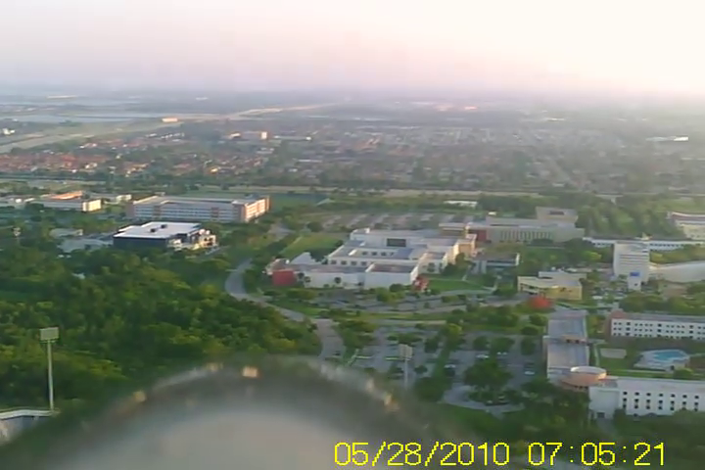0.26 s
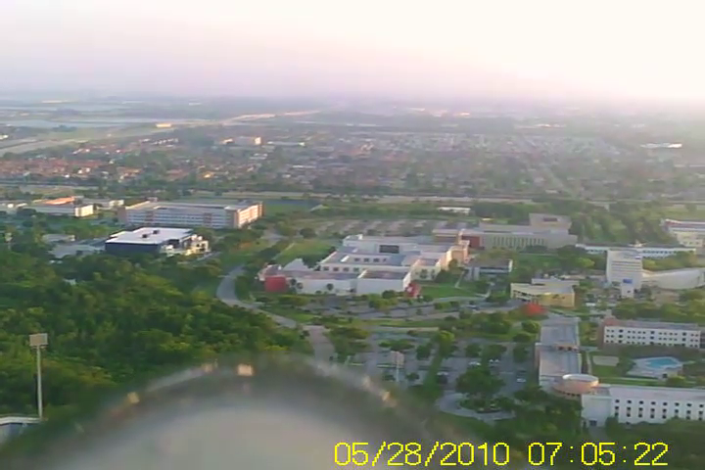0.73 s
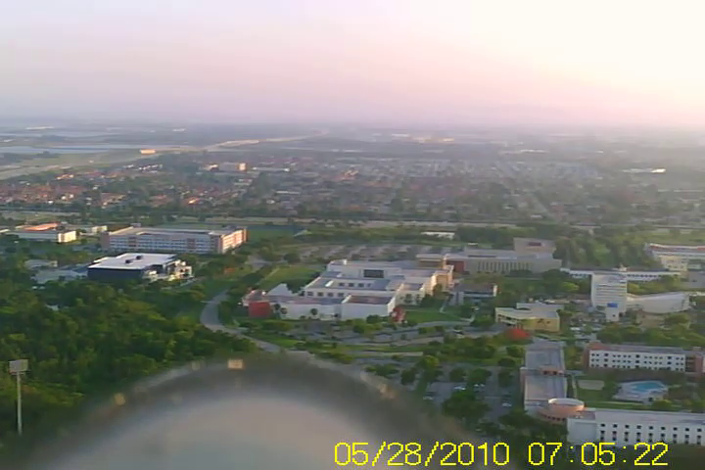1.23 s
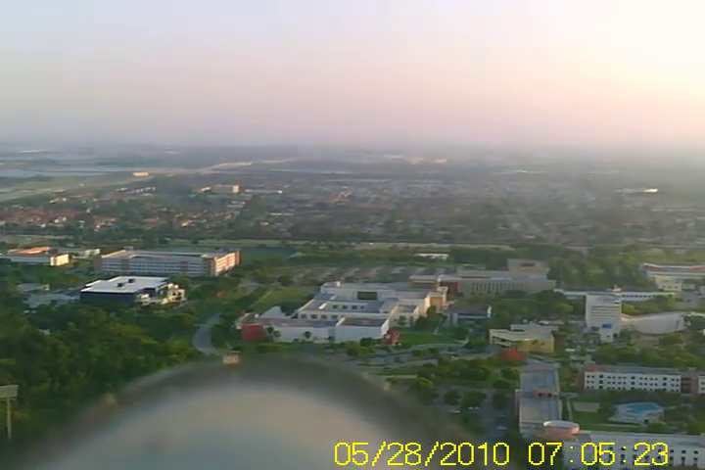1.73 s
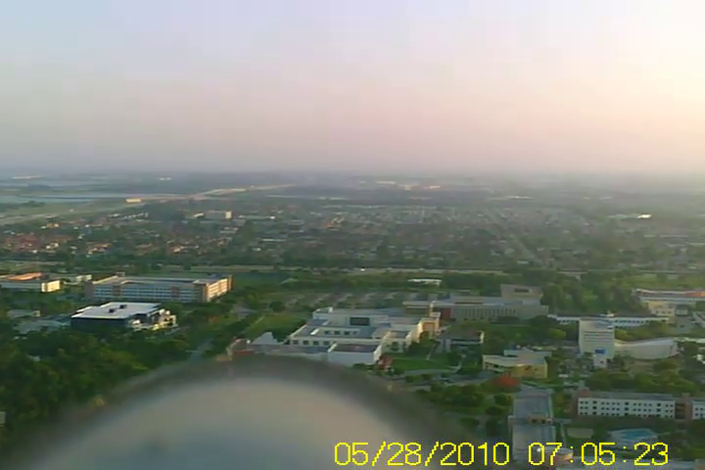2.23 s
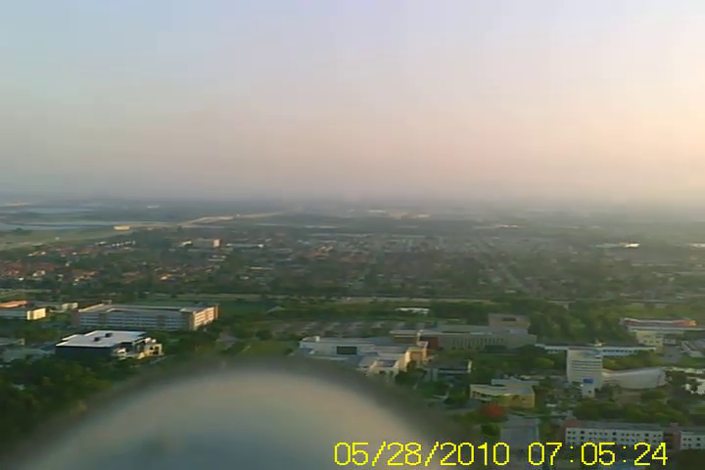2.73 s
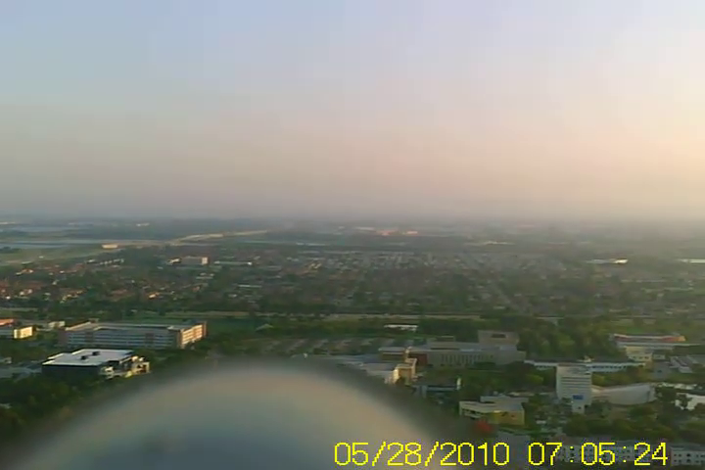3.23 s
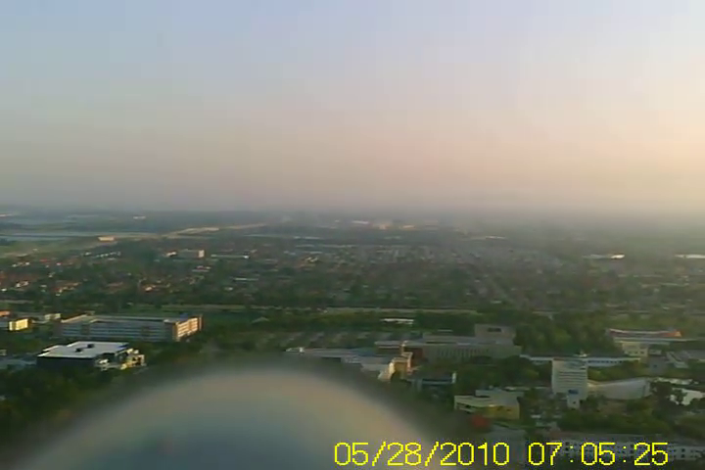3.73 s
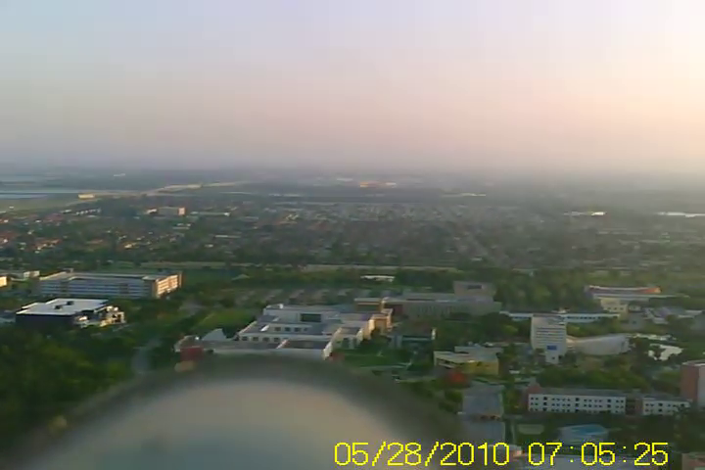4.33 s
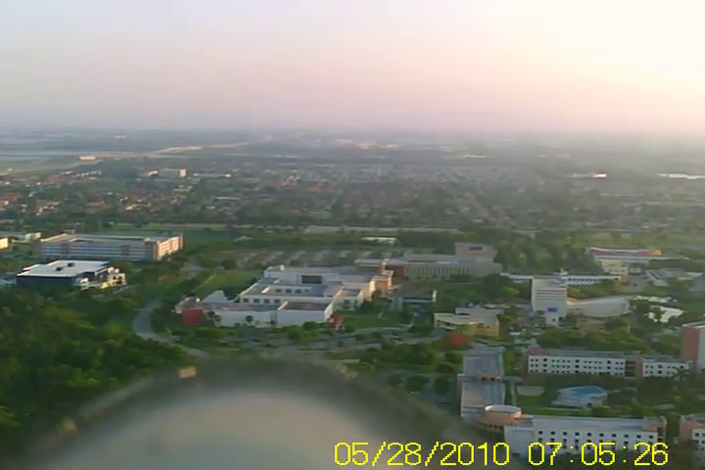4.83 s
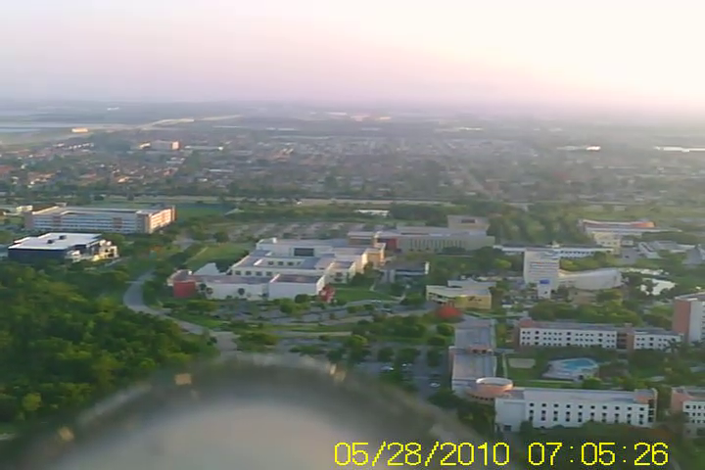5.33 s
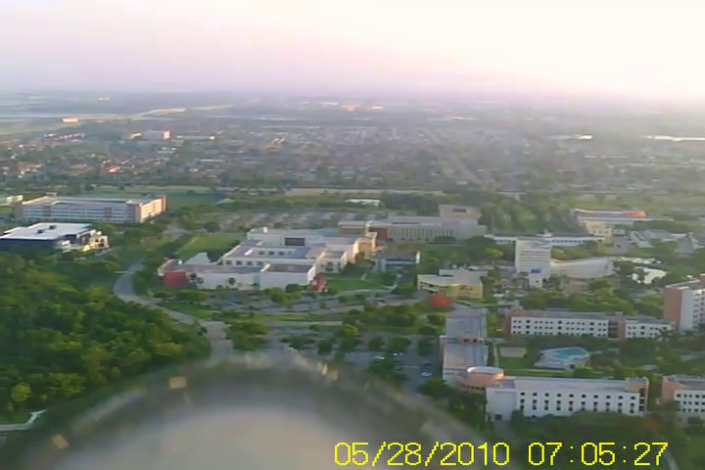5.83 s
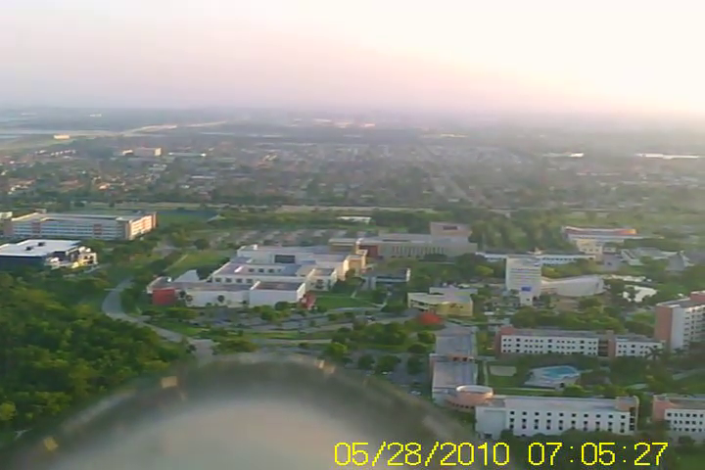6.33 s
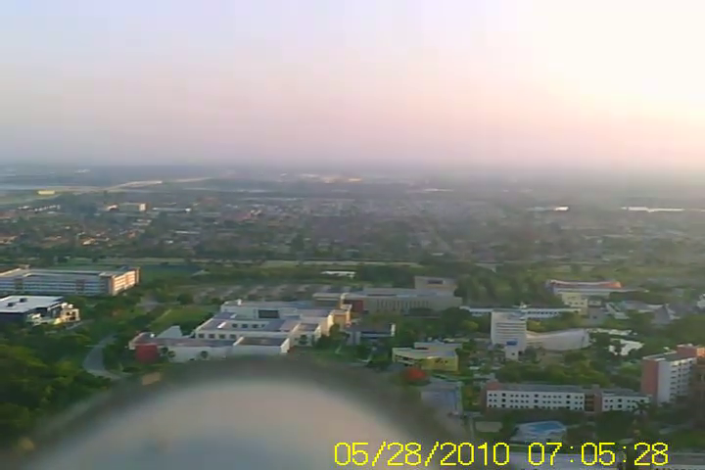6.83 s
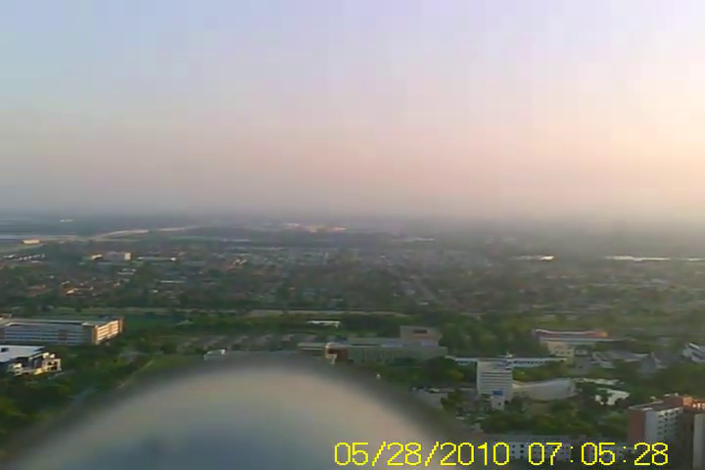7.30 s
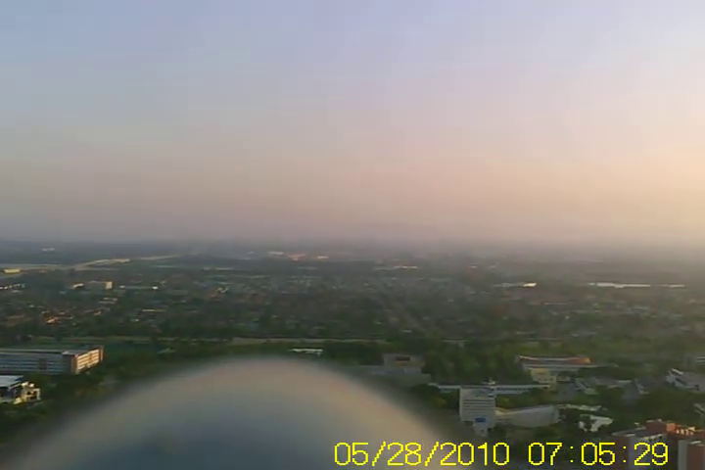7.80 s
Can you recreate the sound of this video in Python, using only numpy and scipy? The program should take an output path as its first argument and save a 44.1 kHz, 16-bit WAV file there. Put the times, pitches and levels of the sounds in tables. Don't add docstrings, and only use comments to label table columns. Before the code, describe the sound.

Air streams over an exposed microphone in open flight: heavy, bassy, uneven rumble with a muffled rush above it and irregular sharp crackles. There is no motor or other source. The wind is fairly strong at first, drops to a duller lull just after four seconds, builds to a fuller, more crackly rush by seven, then falls back. Close, dry, mono, low-fidelity, with barely audible hiss and steady high tones.

```python
import sys
import numpy as np
from scipy import signal
from scipy.fft import rfft, irfft, next_fast_len
from scipy.io import wavfile
from scipy.ndimage import uniform_filter1d

SR = 44100
rng = np.random.default_rng(int(sys.argv[2]) if len(sys.argv) > 2 else 0)


def to_wav(s):
    ch = np.atleast_2d(s).T
    pcm = np.round(np.clip(ch, -1, 1) * 32767)
    wavfile.write(sys.argv[1], SR, pcm.astype(np.int16))


def linear_from_db(decibels):
    return 10 ** (np.asarray(decibels, float) / 20)


N = 355446
SIZE = next_fast_len(N + 8192)
HZ = np.maximum(np.arange(SIZE // 2 + 1) * SR / SIZE, 1)


def unit(x):
    return x / np.sqrt(np.mean(x ** 2))


def causal(points):
    hz, db = np.transpose(points)
    log_gain = np.log(linear_from_db(np.interp(np.log(HZ), np.log(hz), db)))
    cepstrum = irfft(log_gain, SIZE)
    cepstrum[1:SIZE // 2] *= 2
    cepstrum[SIZE // 2 + 1:] = 0
    return np.exp(rfft(cepstrum))


def shape(x, response):
    return irfft(rfft(x, SIZE) * response, SIZE)[:N]


def above(hz, octaves):
    return 1 / (1 + (hz / HZ) ** (4 / octaves))


def walk(rate):
    hold = max(int(SR / rate), 2)
    levels = np.repeat(rng.standard_normal(N // hold + 1), hold)
    slewed = uniform_filter1d(uniform_filter1d(levels, hold), hold)
    return unit(slewed[:N])


# time_s [s], airspeed_m_s [m/s]
AIRSPEED = [(0, 9.3), (.6, 10.2), (1.0, 10.54), (1.5, 10.67), (2.3, 10.62), (3.0, 10.22), (3.4, 9.6),
            (3.8, 9.03), (4.2, 8.57), (4.6, 8.94), (5.0, 9.2), (5.4, 9.68), (5.9, 10.74), (6.5, 11),
            (7.0, 11.3), (7.4, 10.28), (7.8, 10.04), (8.06, 9.3)]
CRUISE_M_S = 10.1


def speed_db():
    time_s, airspeed_m_s = np.transpose(AIRSPEED)
    speed = np.interp(np.arange(N) / SR, time_s, airspeed_m_s)
    return 20 * np.log10(speed / CRUISE_M_S)


def eddies(rate, spread_db, push, smear_s):
    when, sign, size = rng.random((N, 3)).T
    kick_db = np.minimum(-spread_db * np.log(1 - size), 15)
    kicks = (when < rate / SR) * np.where(sign < push, 1, -1) * linear_from_db(kick_db)
    wake = np.exp(-np.arange(400) / (smear_s * SR)) * rng.standard_normal(400)
    wake[0] = 2.22
    smear = rfft(wake, SIZE)
    return unit(shape(kicks - kicks.mean(), smear / np.abs(smear)))


# pitch_hz [Hz], level_db [dB per Hz]
PORT = [(8, -10.5), (25, -4), (90, 0.5), (270, -4.5), (480, -13), (950, -24.5), (1620, -30), (1950, -40.5),
        (2600, -46.5), (2950, -52.5), (4650, -58), (5300, -65.5), (7000, -68), (11000, -97)]
RUMBLE_POWER, RUSH_POWER, FINE_POWER, FINEST_POWER = 1.5, 2.76, 4.2, 4.5
BUFFET_PER_S, BUFFET_DB, FLARE_DB = 12, 0.76, 0.84


def wind():
    speed = speed_db()
    port = causal(PORT)
    mid, fine, finest = above(490, 0.8), above(1900, 0.28), above(3600, 0.4)
    rumble_db = RUMBLE_POWER * speed + BUFFET_DB * walk(BUFFET_PER_S)
    rush_db = RUSH_POWER * speed + FLARE_DB * walk(BUFFET_PER_S)
    shared = eddies(2500, 2.6, 0.8, 0.00013)
    patch = np.clip(walk(220), -2.5, 1.8)

    big = np.sqrt(0.3) * shared + np.sqrt(0.7) * rng.standard_normal(N)
    out = shape(linear_from_db(rumble_db + 0.6 * patch) * big, port * np.sqrt(1 - mid))
    crest = np.clip(unit(out), -2.5, 2.1)

    # band, level_db, rate_per_s, own share of power, patchy_db, crest_db
    scales = [(mid - fine, rush_db, 7000, 0.7, 0.8, 0.8),
              (fine - finest, FINE_POWER * speed, 5000, 0.65, 1.6, 1.4),
              (finest, FINEST_POWER * speed - 0.7, 3500, 0.75, 1.7, 1.6)]
    for band, level_db, rate, own, patchy_db, crest_db in scales:
        air = np.sqrt(1 - own) * shared + np.sqrt(own) * eddies(rate, 2.14, 0.6, 0.0002)
        air = air * linear_from_db(level_db + patchy_db * patch + crest_db * crest)
        out = out + shape(air, port * np.sqrt(np.abs(band)))
    out = unit(out)
    return linear_from_db(-19.5) * (out + 0.015 * out ** 2)


# start_s [s], peak_db [dB in the treble]
FRONTS = [(0.0828, -41), (0.292, -43), (0.5674, -41), (0.848, -40.5), (1.0133, -35.5), (1.1633, -37.5),
          (1.273, -39.5), (1.6797, -41.5), (1.8404, -39.5), (2.083, -39), (2.1216, -40), (2.9691, -36.5),
          (3.0295, -41), (3.1606, -39), (3.1858, -41), (3.5738, -44.5), (3.6392, -41.5), (2.7865, -40.5),
          (6.3864, -39), (4.8463, -41), (5.2039, -38.5), (5.3916, -36), (5.4235, -40), (5.615, -36.5),
          (5.8745, -35.5), (6.6217, -39), (6.6494, -37.5), (7.2564, -41.5), (6.165, -40.5), (7.5287, -37)]
TICKS_PER_S, TICK_DB, TICK_SPREAD_DB, TICK_POWER = 26, -46, 2.3, 3.6
TEAR_S, TEAR_DB = 0.00071, -17
FRONT_DELAY_S, BODY_DB, BODY_SPREAD_DB = 0.0011, -5, 1.5


def fronts():
    when, size = rng.random((int(TICKS_PER_S * N / SR), 2)).T
    tick_db = TICK_DB + TICK_SPREAD_DB * 4 * (size - 0.5)
    tick_db = tick_db + TICK_POWER * speed_db()[(when * N).astype(int)]
    start_s, peak_db = np.hstack([np.transpose(FRONTS), [when * N / SR, tick_db]])

    lag = np.arange(98)
    count = len(start_s)
    tear = linear_from_db(TEAR_DB) * rng.standard_normal((count, 98)) * np.exp(-lag / (TEAR_S * SR))
    tear[:, 0] = np.sign(rng.standard_normal(count))
    tear *= linear_from_db(peak_db)[:, None] / np.sqrt(np.sum(tear ** 2, axis=1, keepdims=True))
    body_db = BODY_DB + BODY_SPREAD_DB * rng.standard_normal((count, 1))

    at = np.minimum(((start_s + FRONT_DELAY_S) * SR).astype(int)[:, None] + lag, N - 1)
    crack, body = np.zeros(N), np.zeros(N)
    np.add.at(crack, at, tear)
    np.add.at(body, at, tear * linear_from_db(body_db))

    port, edge = causal(PORT), above(1500, 0.6)
    bite = edge * (1 + 0.5 * above(3300, 0.4)) * (1 - above(6500, 0.55))
    treble_peak = np.abs(irfft(port * above(2300, 0.2), SIZE)).max()
    return (shape(crack, port * bite) + shape(body, port * (1 - edge))) / treble_peak


# pitch_hz [Hz], level_db [dB]
WHISTLES = [
    (3890, -86),
    (5600, -84),
    (6200, -96),
    (7400, -86),
    (9600, -89),
    (10638, -100),
    (11412, -108),
]
# pitch_hz [Hz], level_db [dB per Hz]
HISS = [(1000, -0.5), (6000, -3), (9800, -3), (10800, -10), (11600, -20), (12100, -35), (12500, -39),
        (16000, -70)]
HISS_DB = -71


def electronics():
    t = np.arange(N) / SR
    tones = np.zeros(N)
    for pitch_hz, level_db in WHISTLES:
        tones += np.sqrt(2) * linear_from_db(level_db) * np.sin(2 * np.pi * pitch_hz * t)
    hiss = shape(rng.standard_normal(N), causal(HISS) * above(800, 0.97))
    return tones + linear_from_db(HISS_DB) * unit(hiss)


CAPSULE_LIMIT = 0.89
FADE_S = 0.006


def scene():
    air = wind() + linear_from_db(-1.5) * fronts()
    air = CAPSULE_LIMIT * np.tanh(air / CAPSULE_LIMIT)
    fade = np.minimum((N - np.arange(N)) / (FADE_S * SR), 1)
    return ((air - air.mean()) * fade)[None]


def roll_off(x):
    return signal.sosfilt(signal.butter(12, 12300, fs=SR, output="sos"), x)


OFFSET = 0.0267


def record(dry):
    mix = dry + electronics() + OFFSET
    return roll_off(mix)


dry = scene()
out = record(dry)
to_wav(out)
```